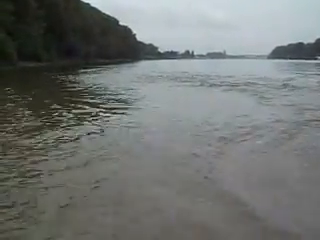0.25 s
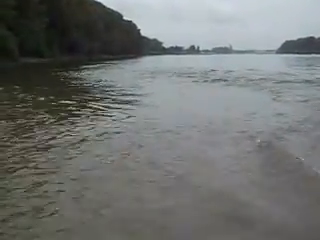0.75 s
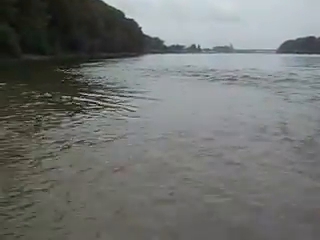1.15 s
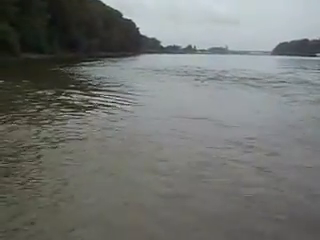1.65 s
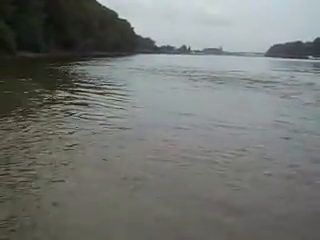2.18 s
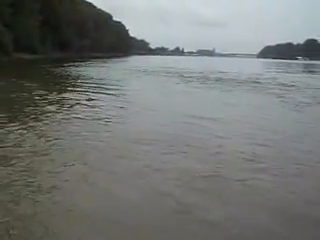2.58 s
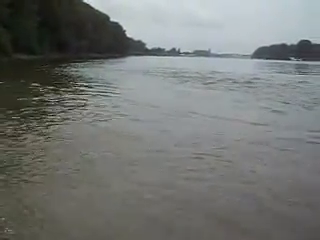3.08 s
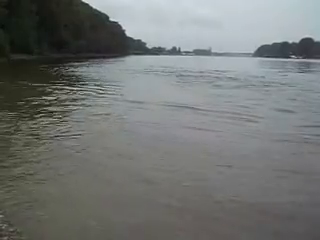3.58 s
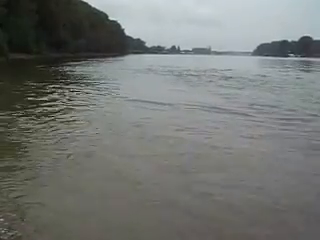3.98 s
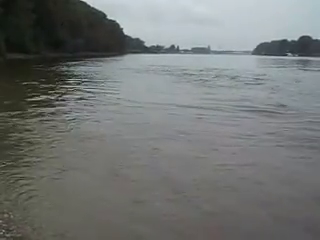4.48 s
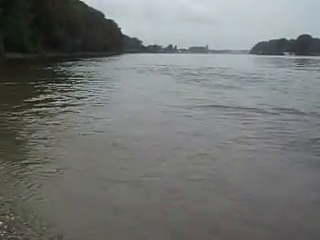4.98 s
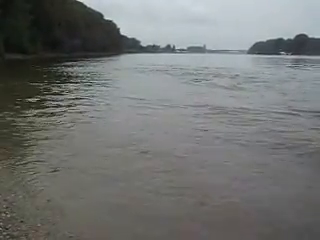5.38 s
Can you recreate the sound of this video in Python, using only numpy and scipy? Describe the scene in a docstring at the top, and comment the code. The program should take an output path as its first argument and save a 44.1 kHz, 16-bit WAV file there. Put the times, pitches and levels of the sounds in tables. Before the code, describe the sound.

Outdoors at the edge of a river, a small wave spills onto the gravel close by and spreads in a hiss of foam. As it drains between the stones, gentle, steady lapping takes over, with bubbly gurgles, trickles and an occasional drip. A softer wash wets the stones at the end, while faint low wind touches the microphone throughout.

```python
"""A small wave breaks on a gravel river bank, and its foam fizzes away over the stones.
The water laps on, sloshing and trickling, with a few sharp drips and gulps of trapped air.
Each bubble is a damped resonator, its air the spring and the water the mass: large ones gurgle,
tiny ones fizz, and countless far ones merge into noise. A light breeze rumbles on the microphone."""
import sys
import numpy as np
from scipy import signal
from scipy.fft import rfft, irfft, next_fast_len
from scipy.io import wavfile

SR = 44100
rng = np.random.default_rng(int(sys.argv[2]) if len(sys.argv) > 2 else 0)


def to_wav(s):
    """Save 16-bit WAV."""
    ch = np.atleast_2d(s).T  # columns
    pcm = np.round(np.clip(ch, -1, 1) * 32767)  # PCM
    wavfile.write(sys.argv[1], SR, pcm.astype(np.int16))


N = 248724

# stages of the toppling crest: (peak time [s], churn level [dB], spray level [dB])
CREST_STAGES = [(0.02, -29.5, -21), (0.13, -30, -25), (0.26, -25, -22), (0.40, -33, -23.5),
                (0.57, -36, -25.5), (0.82, -29.5, -30.5), (0.98, -44.5, -27)]
# vigour of the lapping edge: (time [s], level [dB])
LAP_VIGOUR = [(0, 1.5), (.5, 1), (1.15, -2), (1.85, -1.6), (2.2, 0.8), (2.6, 0.3), (3.0, -0.5),
              (3.35, -1.5), (4.0, -2.5), (4.4, -1.8), (4.95, 0.5), (5.3, 2), (5.55, 2), (5.64, -1)]
# strength of the breeze: (time [s], level [dB])
BREEZE_LEVELS = [(0, -39.5), (.9, -37), (2.3, -38.5), (3.0, -35), (3.8, -38), (4.9, -37.5), (5.64, -41)]
# single drops: (time [s], level [dB], pitch [Hz])
DROPS = [(0.258, -26, 3200), (0.815, -5.5, 3675), (0.908, -8, 3080), (2.778, -15, 3260), (2.789, -24, 2280),
         (4.358, -22.5, 2500), (4.439, -20.5, 1890), (4.711, -19.5, 1044), (4.917, -23, 4200),
         (5.165, -18, 2180), (5.257, -19.5, 2800), (5.396, -21.5, 2200), (5.476, -25, 4430)]
# trapped air: (time [s], level [dB], start pitch [Hz], climb [octaves/s], decay time [s])
AIR_POCKETS = [(0.805, -24, 326, 2.1, 0.015), (.845, -16.5, 854, 8.8, 0.015), (1.574, -15, 670, 7, .005),
               (2.323, -16.5, 400, 27, .007), (2.339, -22, 490, 20, .012), (2.565, -23, 602, 26, 0.01),
               (2.723, -26, 532, 32, .018), (2.752, -23, 470, 8, 0.012), (3.683, -22, 547, 26, 0.013),
               (4.130, -23, 758, 18, 0.0045), (4.173, -21, 368, 39, 0.016), (4.195, -18.5, 660, 18, 0.0053),
               (4.586, -20, 485, 5, 0.0034), (4.624, -23, 440, 34, 0.016), (4.656, -19, 638, 5.5, .006),
               (4.698, -20, 354, 70.6, .009), (4.762, -20.5, 261, 5, .028), (4.856, -17.5, 408, 34.2, .008),
               (4.873, -18.5, 560, 33, 0.0064), (5.102, -21.5, 782, 16, 0.0069),
               (5.128, -23, 480, 35, .012), (5.134, -17, 200, 15.7, 0.011), (5.557, -20.5, 576, 21, 0.0077)]
# spectral envelope of each source: (frequency [Hz], relative level [dB])
BREAKER_SPECTRUM = [(260, -30), (450, -8), (568, -7.5), (688, -7), (907, -1.5), (1250, -12), (1600, -23),
                    (2080, -43), (3520, -120)]
FOAM_SPECTRUM = [(650, -40), (1100, -9), (1330, -14), (1960, -11.5), (2460, -3.5), (3130, -3), (3490, -9),
                 (4340, -12.5), (4960, -17.5), (5530, -27), (6170, -28.5), (6620, -35), (7100, -54.5),
                 (9230, -95), (15600, -120)]
TRICKLE_SPECTRUM = [(760, -36), (1300, -4.5), (1330, -2), (1500, 3.5), (1700, 4), (2280, 1.5), (2690, 3),
                    (3160, -2), (3490, -17.5), (3850, -10), (4400, -9.5), (4720, -9.5), (5130, -14.5),
                    (6340, -27.5), (7000, -48), (9100, -87), (15400, -120)]
SLOSH_SPECTRUM = [(190, -16), (330, -5), (595, -1.5), (794, -1), (1040, -8), (1190, -18), (1350, -25),
                  (1760, -42), (2970, -120)]
GURGLE_SPECTRUM = [(90, -22), (150, -2), (210, 2), (270, 1.5), (330, -3), (450, -14.5)]
BREEZE_SPECTRUM = [(12, -9), (25, 4), (62, 4), (85, -1.5), (130, -1), (200, -16.5), (400, -29)]
SEEP_SPECTRUM = [(3000, -18.5), (3650, 0.5), (4600, -5.5), (5500, -17.5), (6300, -21), (7100, -41.5)]


def from_db(db):
    """Amplitude grows tenfold for every 20 dB."""
    return 10 ** (np.asarray(db) / 20)


def unit_rms(x):
    """Dividing by the rms amplitude gives unit power."""
    return x / np.sqrt(np.mean(x ** 2) + 1e-20)


def power_sum(*gains):
    """Incoherent sounds add in power."""
    return np.sqrt(sum(g ** 2 for g in gains))


def level_curve(rows):
    """The level in dB moves linearly between the given times."""
    times, levels = np.transpose(rows)
    return np.interp(np.arange(N) / SR, times, levels)


def swell(level_db, peak_s, rise_s, fall_s):
    """A Gaussian rise to the peak level, then exponential decay."""
    t = np.arange(N) / SR - peak_s
    return from_db(level_db) * np.exp(np.where(t < 0, -.5 * (t / rise_s) ** 2, -t / fall_s))


def drift(corner_hz):
    """Low-passed noise wanders slowly, at rms 1."""
    step, settling = 40, 2000
    pole = np.exp(-2 * np.pi * corner_hz * step / SR)
    noise = rng.standard_normal(N // step + settling + 2)
    slow = signal.lfilter([1], [1, -2 * pole, pole ** 2], noise)[settling:]
    return np.interp(np.arange(N) / step, np.arange(len(slow)), unit_rms(slow))


def ring(impulses, hz, cycles):
    """A damped resonator answers each impulse with a sine that falls 60 dB in the given cycles."""
    radius = np.exp(-np.log(1000) * hz / (cycles * SR))
    angle = 2 * np.pi * hz / SR
    return signal.lfilter([0, np.sin(angle)], [1, -2 * radius * np.cos(angle), radius ** 2], impulses + 1e-18)


def coloured(x, spectrum):
    """A causal, minimum-phase filter imposes the spectrum, falling steeply beyond its ends; rms 1."""
    size = 2 * next_fast_len(N // 2 + 4096)
    hz, db = np.transpose(spectrum)
    log_hz = np.log(np.maximum(np.arange(size // 2 + 1) * SR / size, 1))
    outside = np.maximum(np.log(hz[0]) - log_hz, 0) + np.maximum(log_hz - np.log(hz[-1]), 0)
    gain = from_db(np.maximum(np.interp(log_hz, np.log(hz), db) - 60 * outside, -100))
    cepstrum = irfft(np.log(gain))[:size // 2]
    phase = rfft(2 * cepstrum, size).imag
    return unit_rms(irfft(rfft(x, size) * gain * np.exp(1j * phase))[:N])


def bubbles(low_hz, high_hz, per_s, cycles, spread_db, clump_db, pitches):
    """Bubbles of random strength and pitch ring at birth; a drifting birth rate clumps them; rms 1."""
    born = np.flatnonzero(rng.random(N) < per_s / SR * from_db(clump_db * drift(corner_hz=14)))
    strength, sign, pitch = rng.random((N, 3))[born].T
    heights = from_db(-spread_db * np.log(np.maximum(strength, np.exp(-3)))) * np.sign(sign - .5)
    cloud = np.zeros(N)
    for k, hz in enumerate(np.geomspace(low_hz, high_hz, pitches)):
        at_pitch = (pitch * pitches).astype(int) == k
        impulses = np.zeros(N)
        impulses[born[at_pitch]] = heights[at_pitch]
        cloud += ring(impulses, hz, cycles)
    return unit_rms(np.diff(cloud, prepend=0))   # the pressure jumps as each bubble pinches off


def water(near, spectrum, far_db):
    """Countless far bubbles superpose into Gaussian noise behind the near ones."""
    return coloured(near + from_db(far_db) * rng.standard_normal(N), spectrum)


def breaker():
    """The spilling crest entrains air, which rings as heavily damped bubbles."""
    near = bubbles(460, 1530, per_s=1000, cycles=4.1, spread_db=-0.5, clump_db=1.0, pitches=12)
    return water(near, BREAKER_SPECTRUM, far_db=-0.5)


def crest_gains():
    """The stages of the collapse add in power, giving one gain for churn and one for spray."""
    churn = [swell(db, s, rise_s=0.12, fall_s=0.27) for s, db, _ in CREST_STAGES]
    spray = [swell(db, s, rise_s=0.12, fall_s=0.26) for s, _, db in CREST_STAGES]
    return power_sum(*churn), power_sum(*spray)


def foam():
    """Resonant frequency varies inversely with radius, so tiny bursting bubbles fizz high."""
    near = bubbles(1600, 5780, per_s=3200, cycles=13, spread_db=0, clump_db=1.4, pitches=32)
    return water(near, FOAM_SPECTRUM, far_db=1.0)


def sheet_gain(level_db, rise_s, turn_s, drain_s):
    """The foam sheet runs up the gravel, holds, then drains by exponential decay."""
    t = np.arange(N) / SR
    spreading = 1 - np.exp(-t / rise_s)
    draining = np.exp(-np.maximum(t - turn_s, 0) / drain_s)
    return from_db(level_db) * spreading * draining


def trickle():
    """Droplets draining between the stones excite sparser bubble resonances."""
    near = bubbles(1393, 6670, per_s=1300, cycles=16, spread_db=4.5, clump_db=1.5, pitches=32)
    return water(near, TRICKLE_SPECTRUM, far_db=5.0)


def lap_gain(level_db, db_per_db):
    """Amplitude follows the vigour of the lapping by a power law."""
    return from_db(level_db + db_per_db * level_curve(LAP_VIGOUR))


def slosh():
    """The lapping edge folds in middle-sized bubbles that resonate in the midrange."""
    near = bubbles(344.5, 1510, per_s=1200, cycles=15.7, spread_db=2.37, clump_db=1.0, pitches=18)
    return water(near, SLOSH_SPECTRUM, far_db=6.0)


def gurgle():
    """Large bubbles in the deeper water move more mass and so resonate low."""
    near = bubbles(164, 368, per_s=220, cycles=8.7, spread_db=-2.2, clump_db=0.55, pitches=6)
    return water(near, GURGLE_SPECTRUM, far_db=11.0)


def breeze():
    """Turbulent pressure on the microphone rumbles with the gusts."""
    return from_db(level_curve(BREEZE_LEVELS)) * coloured(rng.standard_normal(N), BREEZE_SPECTRUM)


def drips():
    """Each drop traps one small bubble, which pings in free, damped oscillation."""
    pings = np.zeros(N)
    for s, level_db, hz in DROPS:
        impulse = np.zeros(N)
        impulse[round(s * SR)] = from_db(level_db)
        pings += ring(impulse, hz, cycles=50)
    # the water softens the click of each impact
    return signal.sosfilt(signal.butter(4, [800, 4800], "band", fs=SR, output="sos"), pings)


def small_pockets(count=6, level_db=-26, centre_hz=724, max_climb=34, decay_s=0.007):
    """Faint air pockets form at random and start ringing within an octave of each other."""
    return [(when * (N - 1) / SR, level_db, centre_hz * 2 ** (pitch - .5), max_climb * speed, decay_s)
            for when, pitch, speed in rng.random((count, 3))]


def gulps(swell_cycles=3.2, surface_octaves=1.4, overtone_db=-15.5, slap_db=-15, slap_s=0.02):
    """Water slaps shut over an air pocket, whose resonance climbs until it reaches the surface."""
    tones, slaps = np.zeros(N), np.zeros(N)
    t = np.arange(SR // 6) / SR
    for s, level_db, hz, climb, decay_s in AIR_POCKETS + small_pockets():
        pitch = hz * 2 ** np.minimum(climb * t, surface_octaves)
        swell_s = swell_cycles / hz   # big pockets swell more slowly
        attack = np.sin(np.pi / 2 * np.minimum(t / swell_s, 1)) ** 2
        decay = np.exp(-np.maximum(t - swell_s, 0) / decay_s)
        phase = 2 * np.pi * (np.cumsum(pitch) / SR + rng.random())
        partials = np.sin(phase) + from_db(overtone_db) * np.sin(2 * phase)
        tone = from_db(level_db) * attack * decay * partials
        slap = from_db(level_db + slap_db) * attack * np.exp(-t / slap_s)
        at = round(s * SR)
        tones[at:at + len(t)] += tone[:N - at]
        slaps[at:at + len(t)] += slap[:N - at]
    muffled = signal.sosfilt(signal.butter(6, 1110, fs=SR, output="sos"), tones)   # by the water
    return muffled + slaps * coloured(rng.standard_normal(N), SLOSH_SPECTRUM)


def seep():
    """Thin water sinks into the gravel, and minute resonating bubbles make a fine crackle."""
    near = bubbles(3400, 6000, per_s=3200, cycles=12, spread_db=8.0, clump_db=-2.5, pitches=12)
    return water(near, SEEP_SPECTRUM, far_db=1.0)


def scene():
    """Pressures superpose: the wave breaks, spreads as foam and sinks back while the edge laps on."""
    churn, spray = crest_gains()
    sheet = sheet_gain(level_db=-23.5, rise_s=0.14, turn_s=1.83, drain_s=0.32)
    fizz = power_sum(spray, sheet, lap_gain(-43.5, db_per_db=0.36)) * foam()
    droplets = power_sum(from_db(-8.5) * spray, lap_gain(-36, db_per_db=0.8)) * trickle()
    crest = power_sum(churn, from_db(-16) * sheet, lap_gain(-40, db_per_db=0.7)) * breaker()
    edge = lap_gain(-30.5, db_per_db=0.82) * slosh() + lap_gain(-36.5, db_per_db=0.9) * gurgle()
    backwash = swell(-32.5, peak_s=2.04, rise_s=0.27, fall_s=0.43)
    next_wash = swell(-43.5, peak_s=5.45, rise_s=0.44, fall_s=0.43)   # the next wave wets the stones
    crackle = power_sum(backwash, next_wash) * seep()
    return (crest + fizz + droplets + edge + breeze() + drips() + gulps() + crackle)[None]


def record(dry):
    """A small microphone of narrow bandwidth acts as a steep low-pass filter."""
    cutoff_hz = 7200
    return signal.sosfilt(signal.ellip(12, .1, 80, cutoff_hz, fs=SR, output="sos"), dry)


dry = scene()
out = record(dry)
to_wav(out)
```